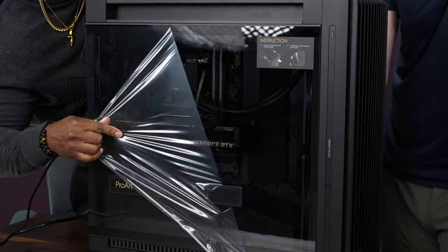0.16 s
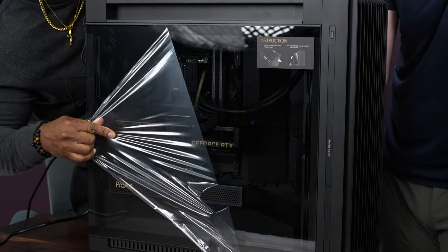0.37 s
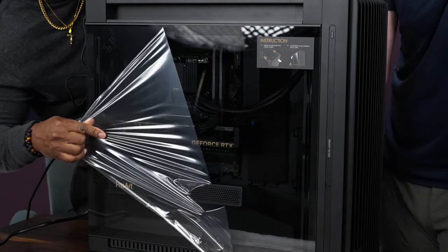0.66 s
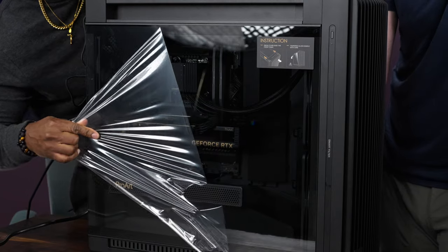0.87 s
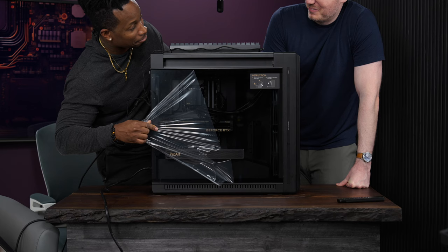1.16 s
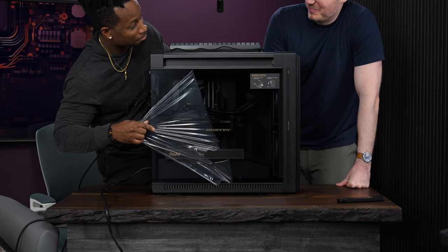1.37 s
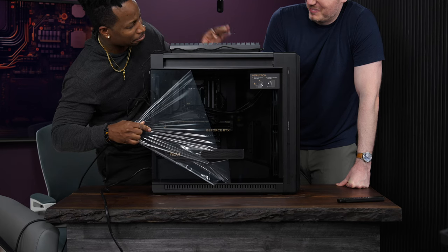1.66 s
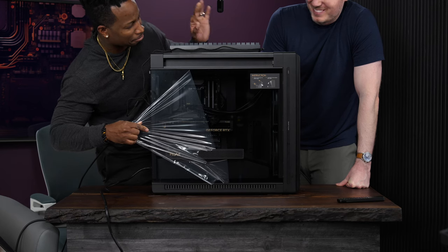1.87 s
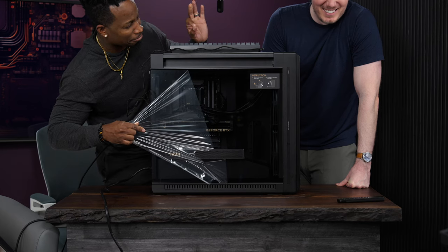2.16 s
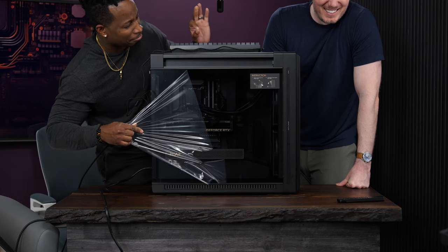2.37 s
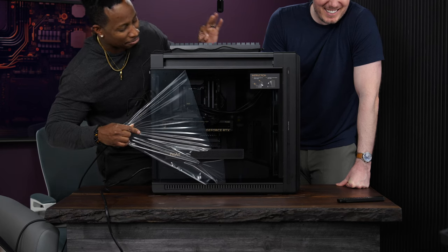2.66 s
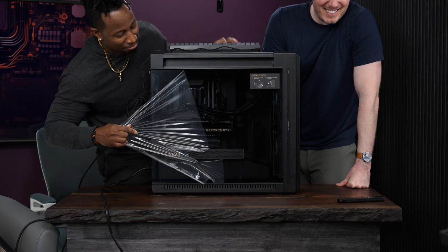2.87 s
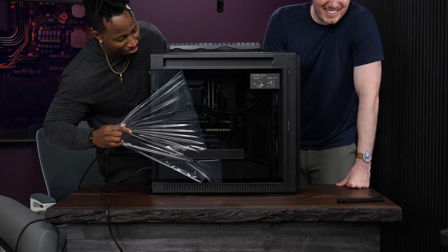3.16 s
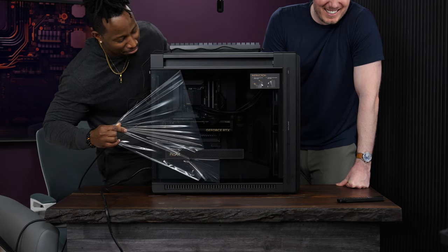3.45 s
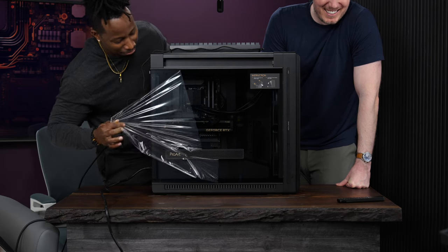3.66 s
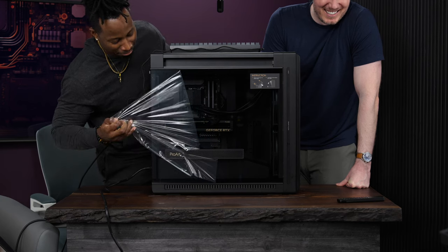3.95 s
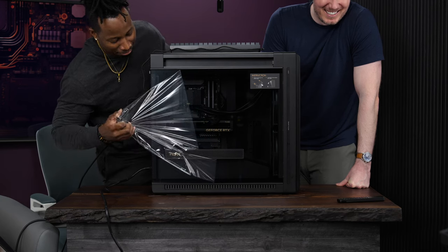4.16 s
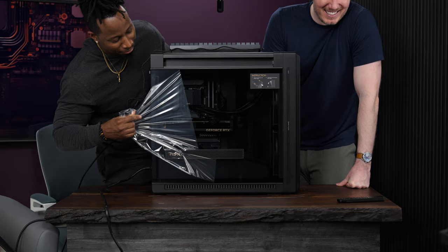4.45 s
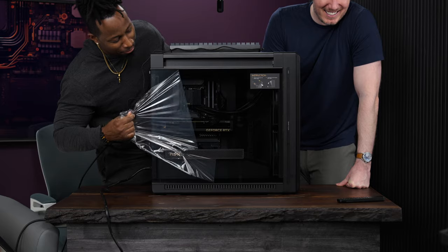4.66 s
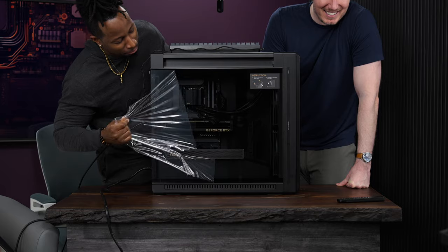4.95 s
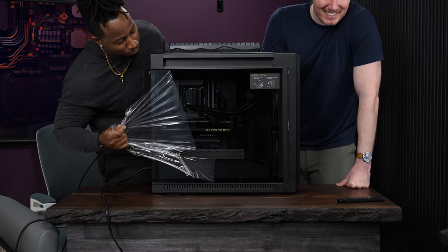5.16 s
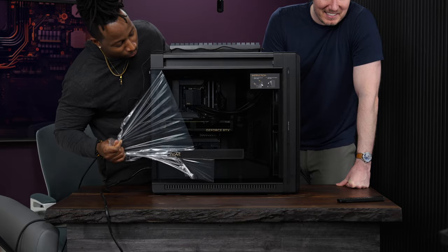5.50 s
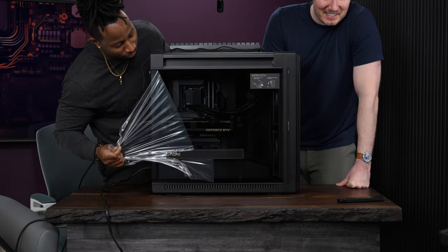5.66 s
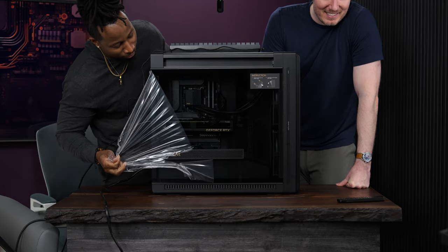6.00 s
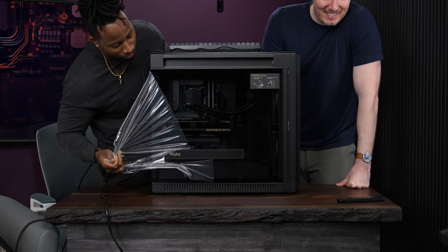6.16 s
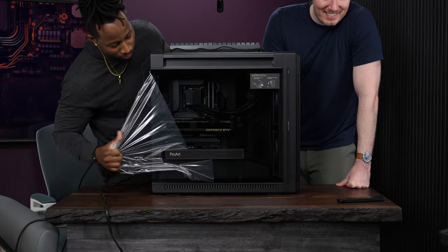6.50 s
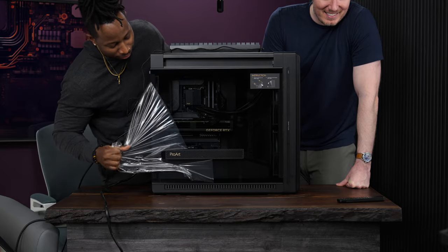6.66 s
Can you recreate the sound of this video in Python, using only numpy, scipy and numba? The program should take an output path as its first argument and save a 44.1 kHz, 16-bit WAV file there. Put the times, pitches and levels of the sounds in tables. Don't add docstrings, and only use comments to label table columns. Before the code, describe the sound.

A small, dry studio with faint steady air noise, close microphone. From 0 to 0.1 s, short low buzzes as sticky film stutters off glass; soft crackles at 0.3-0.4 s, a small tug, then tiny high squeals sliding down around 0.65 s. Buzzing trains at roughly a hundred slips a second run from 0.7 to 1.35 s, weakening into faint creaky stutters until 2.1 s. From 2.26 to 3.1 s, sharp crackling rips thump the glass like a drum, followed by a rapid run of irregular jerks at 3.2-3.4 s. Folds gather at 3.5-3.9 s with ticks. Loud, dense crumpling bursts from 4.0 to 4.35 s, strongest near 4.1 and 4.25 s with hollow knocks, and again at 4.5-4.9 s. From 5 to 5.9 s only sparse dry snaps and quiet creases; crackling gets busier at 6-6.6 s, with one sharper crease at 6.07 s. From 6.7 s a bright, dense hissing tear swells to the end.

```python
import sys
import numpy as np
from scipy import signal
from scipy.fft import rfft, irfft, next_fast_len
from scipy.io import wavfile
from scipy.ndimage import uniform_filter1d
from numba import njit

SR = 44100
rng = np.random.default_rng(int(sys.argv[2]) if len(sys.argv) > 2 else 0)


def bounce(signal):
    frames = np.transpose(np.atleast_2d(signal))
    limited = np.clip(frames, -1, 1)
    pcm = np.round(limited * 32767).astype(np.int16)
    wavfile.write(sys.argv[1], SR, pcm)


def boost_factor(decibels):
    exponent = np.asarray(decibels, float) / 20
    return 10 ** exponent


N = 301203
t = np.arange(N) / SR

# frequency in Hz, level in dB per Hz.
STUDIO_AIR = [(28, -28), (98, -15.5), (194, -13), (311, -18.5), (526, -30), (1160, -22), (6550, -20),
              (16000, -71)]
# time in seconds, length in seconds, depth in dB.
RESTS = [
    (5.106, 0.07, -4),
    (5.532, .04, -14),
    (5.87, 0.04, -12),
    (6.128, 0.023, -19),
    (6.443, 0.011, -9),
    (0.632, 0.082, -16),
    (2.23, .04, -3),
]

# start in seconds, end in seconds, slips per second in Hz,
# level in dB, panel push in dB.
EVEN_TRAINS = [
    (.003, .03, 126.9, -36, -11.5),
    (.0465, .074, 120.4, -36.5, -12.5),
    (.6981, .742, 101.4, -41, -20),
    (.7757, .905, 142.7, -44, -17),
    (.9091, .932, 103, -45, -21),
    (1.0491, 1.19, 101.9, -49, -22),
    (1.1978, 1.348, 103.8, -50, -20),
    (2.0103, 2.09, 103.6, -63, -16.5),
]
LOOSE_TRAINS = [
    (.0356, .04, 109, -35, -14),
    (.6905, .695, 110, -36, -29),
    (.7492, .772, 111, -50.5, -17),
    (.9491, 1.04, 103.5, -49.5, -18),
    (1.4826, 1.495, 108.4, -56, -19),
    (1.5254, 1.59, 111, -60.5, -18),
    (1.9317, 2.0, 104.2, -63, -16),
]
DYING_TRAINS = [
    (.0785, .102, 68.9, -53, -6),
    (.439, .5, 121.2, -55.5, -15),
    (1.3525, 1.364, 117, -54.5, -20),
    (1.4333, 1.47, 123, -57, -21),
]
GROWING_TRAINS = [
    (1.605, 1.685, 125.1, -64.5, -9),
    (1.6926, 1.746, 119, -57, -11.5),
    (2.0957, 2.12, 103, -62.5, -11),
]
# time in seconds, peak in dB.
JERKS = [(3.186, -46), (3.192, -46), (3.202, -38), (3.22, -41), (3.233, -43), (3.24, -27), (3.2472, -32.5),
         (3.2528, -31), (3.255, -32), (3.267, -29), (3.276, -37), (3.284, -28), (3.288, -26), (3.302, -48),
         (3.313, -30.5), (3.32, -30.5), (3.3289, -28), (3.3452, -30), (3.3542, -36), (3.3577, -27),
         (3.364, -41), (3.371, -24.5), (3.381, -32)]

# frequency in Hz, width in Hz, level in dB.
TAUT_FILM = [(2210, 610, 0.5), (3000, 700, 2), (5400, 3300, 4.5), (8060, 720, 4.5), (8530, 690, 2.5),
             (12140, 3000, 1), (13000, 710, -19), (1350, 260, -10.5), (15000, 1300, -1)]
STRIP = [(4450, 88, -27), (5300, 430, 4.5), (5650, 340, -12), (7590, 1100, -6), (8840, 240, -10.5),
         (10600, 280, -7), (13900, 580, -19)]
GLASS = [(626, 30, -7.5), (708, 24, -8.5), (990, 130, -14), (1252, 32, -12), (1620, 160, -6),
         (1907, 124, -2.5), (2150, 49, -5.5), (2820, 140, -5.5), (3150, 69, 0)]
PANEL = [(73, 46, 3), (140, 28.6, 4.5), (227.5, 86, 0), (146.5, 25, -18), (203, 9.7, 3.5)]
CASE_BODY = [(362, 101, -6), (513.3, 18, 2), (600, 147, 1.5), (843, 815, 4), (1014, 650, 4)]
# frequency in Hz, width in Hz, share removed from 0 to 1.
GAPS = [(3000, 350, 0.2), (6400, 130, 0.8), (8570, 560, 0.17), (10300, 410, 0.9), (12300, 630, 0.6),
        (13700, 600, .8)]
# frequency in Hz, level in dB per Hz.
FILM_COLOUR = [(710, -78), (1200, -10), (1590, -7), (2160, -4), (3010, -3.5), (5550, -1.5), (7700, -5),
               (15500, -11)]

# time in seconds, rustle in dB.
FIRST_RUSTLE = [
    (0.09, -50.5),
    (0.248, -65),
    (0.542, -60),
    (0.67, -73),
]
LATER_RUSTLE = [(1.36, -67.5), (1.57, -60), (1.8, -67), (2.5, -77.5), (3.12, -68), (3.2, -52.5),
                (3.385, -48.5), (3.43, -63), (3.66, -62), (4.04, -58), (4.34, -62.5), (4.57, -49.5),
                (4.72, -39), (4.89, -45), (4.98, -64.5), (5.9, -61.5), (6.14, -55), (6.51, -58.5)]
# time in seconds, peak in dB, panel in dB, fade T60 in seconds.
TUGS = [
    (0.407, -41.5, -24, 0.037),
    (0.588, -44, -40, 0.028),
]
RIPS = [(2.2676, -39.5, -10.5, 0.27), (2.399, -33, -26, 0.055), (2.559, -37, -26, 0.04),
        (2.6155, -23, -14, 0.092), (2.65, -43, -6, 0.081), (2.6939, -31.5, -8, 0.12),
        (2.7454, -39, -18, 0.035), (2.7764, -32, -9.5, 0.11), (2.8125, -38.5, -15, 0.075),
        (2.8598, -32, -9.5, 0.14), (2.967, -38, -17.5, 0.36), (3.043, -32, -18, 0.11),
        (3.202, -24, -44, 0.024)]
# time in seconds, peak in dB, panel in dB, fade T60 in seconds, film pitch in Hz.
GRABS = [
    (3.5161, -38.5, -18.5, 0.053, 3820),
    (3.546, -35, -29, 0.088, 4300),
    (3.573, -33, -23, 0.23, 2460),
    (3.6965, -25.5, -19, 0.13, 6400),
    (3.772, -53, -30, 0.05, 5670),
    (3.8946, -44, -3, 0.036, 6030),
]
CRUMPLES = [(4.088, -24, -37, 0.19, 6500), (4.1042, -10.5, -22, 0.074, 6400),
            (4.189, -27, -16, 0.033, 1900), (4.212, -37, -34, 0.018, 9700), (4.425, -29.5, -37, 0.02, 4350),
            (4.441, -30.5, -16, 0.1, 4020), (4.517, -36, -13, 0.22, 4900),
            (4.5483, -23.5, -24, 0.043, 2520), (4.655, -16, -24, 0.034, 3800),
            (4.7756, -16, -13, 0.035, 2580), (4.8283, -26, -16, 0.22, 5870),
            (4.902, -32.5, -12, 0.19, 2820), (4.982, -43.5, -18.5, 0.16, 5940),
            (6.585, -31, -12.5, 0.22, 4250)]
YIELDS = [(0.321, -40.5, -12.5, 0.16, 5500), (.338, -36, -10, 0.061, 5840),
          (2.309, -29.5, -10.5, 0.055, 5400), (2.4339, -27.5, -12, 0.15, 5630),
          (2.511, -23, -10, 0.12, 5400), (2.936, -35.5, -5, 0.11, 5400), (2.941, -31, -12, 0.087, 5400),
          (4.0051, -13, -16.5, 0.11, 2140), (4.0407, -13.5, -20, 0.12, 3930), (4.2467, -5, -16, 0.09, 2435),
          (4.313, -13, -7, 0.13, 4960), (4.583, -23, -34, 0.22, 3700), (4.639, -10, -43, 0.079, 3800),
          (5.295, -35, -40, 0.043, 4230)]
SLOW_GRABS = [
    (3.592, -19, -25, 0.15, 4570),
    (3.642, -27.5, -33, 0.074, 5600),
    (4.586, -21.5, -34, 0.08, 2600),
]
# time in seconds, peak in dB, fade T60 in seconds,
# film pitch in Hz, case body in dB.
CREASES = [(5.041, -43.5, 0.087, 1900, -5.5), (5.091, -59.5, 0.19, 4500, -1),
           (5.169, -37.5, 0.014, 4850, 2), (5.359, -51.5, 0.079, 3000, -1), (5.587, -50.5, 0.12, 2210, -3),
           (5.621, -46.5, 0.13, 1990, -6.5), (5.699, -40, 0.02, 3800, -6), (5.7281, -48, 0.098, 1510, 0.5),
           (5.884, -43.5, 0.26, 6200, -40), (5.941, -38, 0.058, 2400, -40), (5.984, -43, 0.15, 2320, -22),
           (6.035, -35, 0.043, 5900, -29), (6.073, -21.5, 0.073, 2560, -15.5),
           (6.138, -34, 0.03, 2620, -39), (6.197, -39, 0.11, 2600, -9), (6.222, -31, 0.1, 4070, -10),
           (6.2656, -29, 0.042, 4670, -19), (6.31, -37, 0.096, 6100, -10), (6.3874, -47.5, 0.57, 2420, -31),
           (6.4745, -38, 0.15, 6350, -19), (6.519, -43.5, 0.46, 5560, -25), (6.702, -40.5, 0.08, 5800, -46),
           (6.713, -40, 0.067, 7050, -41)]

# time in seconds, peak in dB, pitch in Hz.
KNOCKS = [(.15, -47.5, 577), (1.4, -55, 106), (1.708, -44, 550), (1.724, -37, 600), (2, -67, 554),
          (2.272, -37, 576), (2.5, -45, 540), (2.405, -45, 560), (2.44, -40, 550), (2.519, -28.5, 560),
          (2.562, -39.5, 526), (2.624, -28, 534), (2.7, -34, 520), (2.78, -48, 524), (2.862, -37, 520),
          (2.985, -43, 199), (3.05, -45, 524), (3.06, -39, 142), (3.595, -22.5, 1450), (4.012, -14, 2140),
          (4.041, -14, 790), (4.048, -10, 870), (4.0905, -21, 1260), (4.257, -13, 944), (4.045, -21, 560),
          (4.105, -9, 1316), (4.107, -14, 1006), (4.012, -23.5, 346), (4.04, -28.5, 118), (4.108, -27, 203),
          (4.25, -18, 132), (4.253, -17, 190), (4.835, -29, 120), (4.92, -37, 121), (4.254, -16, 2170),
          (4.256, -12.5, 1260), (4.258, -22, 522), (4.3135, -14, 203), (4.55, -23.5, 203),
          (4.628, -20, 203), (4.645, -18, 196), (5.345, -52, 555), (5.735, -42, 502), (5.74, -50, 148),
          (6.072, -33, 528), (6.588, -35.5, 79.6), (6.59, -34, 354), (6.592, -32, 650)]
SNAPS = [(0.3035, -43, 6400), (0.407, -31, 6580), (4.5064, -32, 5170), (4.6394, -19, 3770),
         (4.6556, -14, 3800), (4.7014, -26, 2710), (4.7317, -22, 4900), (4.7755, -21, 2670),
         (4.8044, -26, 5410), (4.881, -28, 4830), (5.0414, -48, 1960), (5.1687, -37.5, 5040),
         (5.1886, -51, 5390), (5.2024, -40, 5830), (5.2215, -43, 2990), (5.2435, -56, 4770),
         (5.2734, -43, 4450), (5.3737, -46, 5380), (5.416, -44, 5260), (5.5114, -44, 5070),
         (5.5323, -49, 2550), (5.551, -44, 5390), (5.5874, -40, 2240), (5.6205, -39, 3070),
         (5.8007, -37, 6100), (5.8828, -38, 3847), (5.8877, -38, 5640), (5.908, -44, 4610),
         (5.9434, -43, 2420), (5.9853, -30, 2320), (6.0376, -36, 4260), (6.0624, -37, 2500),
         (6.1584, -34, 6670), (6.1674, -27, 8150), (6.1823, -40, 2570), (6.2224, -30, 4130),
         (6.2311, -25.5, 2480), (6.2564, -26, 6020), (6.3088, -27, 6150), (6.4595, -44, 3560),
         (6.475, -35, 6120), (6.5196, -40, 5560), (6.7137, -37, 5890), (6.7501, -36, 5610),
         (6.7615, -21, 5840), (6.7754, -25, 4430), (6.8077, -28, 5400), (6.8165, -27, 6000)]
POPS = [(2.2668, -33.5, 5400), (2.4008, -35.5, 4870), (2.4399, -33, 5800), (2.4455, -26, 5650),
        (2.5215, -23, 5300), (2.6141, -25.5, 5300), (2.7766, -25, 5400), (2.8576, -27, 5460),
        (4.104, -35, 6500), (4.0595, -35, 5700), (4.2569, -10.5, 5530), (6.0743, -33, 2630),
        (6.3878, -42, 2480), (6.7008, -32, 6200), (6.8244, -17, 6230),
        (2.259, -61, 4000), (2.387, -59, 5000), (2.497, -42, 5800), (3.124, -48, 5240), (3.149, -50, 4830),
         (3.1679, -35, 5400), (3.173, -33, 5330), (3.458, -47, 5040), (3.502, -53, 5500),
         (3.484, -55, 3230), (3.531, -50, 7000), (3.554, -40, 5760), (3.566, -36, 5030), (3.585, -39, 3000),
         (3.743, -45, 4000), (3.775, -44, 5470), (3.844, -50.5, 2040), (3.861, -50, 7500),
         (3.93, -42, 5600), (3.956, -47, 5570), (3.974, -48, 6860), (3.991, -40, 7000), (5.957, -42, 4530),
         (5.993, -43, 2460), (6.204, -42, 2690), (6.4057, -42, 5730), (5.0405, -50, 2030),
         (5.132, -52, 4400), (5.262, -46, 4000), (5.382, -48, 6100), (5.4298, -44, 5500),
         (5.589, -53, 2300), (5.6056, -53, 1660), (5.682, -49.5, 1650), (5.701, -43, 3930),
         (5.837, -46, 5050), (5.846, -44, 6520)]
# start in seconds, end in seconds, first pitch in Hz, last pitch
# in Hz, level in dB.
SQUEALS = [(0.229, 0.263, 550, 630, -66), (0.413, 0.426, 6850, 5700, -50.5),
           (0.423, 0.434, 7900, 7600, -55), (0.42, .432, 6600, 6700, -52),
           (0.616, 0.653, 6740, 6460, -52.5), (0.657, 0.661, 6700, 5700, -48),
           (0.66, 0.669, 3930, 3850, -51), (.661, 0.677, 7800, 7650, -48),
           (0.668, 0.676, 3740, 3690, -43.5), (.677, 0.69, 3715, 2100, -43.5),
           (0.677, 0.686, 3880, 3770, -49), (0.681, 0.691, 4660, 4080, -43.5),
           (1.825, 1.867, 640, 540, -74), (1.952, 2.042, 207, 203, -65.5), (1.96, 2.047, 1210, 1200, -75),
           (2.05, 2.115, 1200, 1160, -75)]


def level(x, db):
    return x * boost_factor(db) / np.sqrt(np.mean(x ** 2))


@njit
def svf(x, hz, width):
    y = np.empty(len(x))
    band, low, g, k = 0., 0., 0., 0.
    for i in range(len(x)):
        if i == 0 or hz[i] != hz[i - 1]:
            g = np.tan(np.pi * hz[i] / SR)
            k = width / hz[i]
        v = (band + g * (x[i] + 1e-18 - low)) / (1 + g * (g + k))
        band = 2 * v - band
        low = low + 2 * g * v
        y[i] = k * v
    return y


def mode(x, hz, width):
    return svf(x, np.full(len(x), float(hz)), float(width))


def ring(x, modes):
    return sum((-1) ** k * boost_factor(db) * mode(x, hz, width) for k, (hz, width, db) in enumerate(modes))


def colour(x, points):
    hz, db = np.transpose(points)
    n = next_fast_len(N, True)
    bins_hz = np.fft.rfftfreq(n, 1 / SR)
    gain = boost_factor(np.interp(np.log(bins_hz + 1), np.log(hz), db))
    return irfft(rfft(x, n) * gain, n)[:N]


def grains(rate, spread_db):
    at, sign, size = rng.random((3, N // 8))[:, :int(rate * N / SR)]
    out = np.zeros(N)
    out[(at * N).astype(int)] = np.sign(sign - .5) * boost_factor(spread_db * np.minimum(-np.log(1 - size), 3))
    return level(out, 0)


def fade(x, t60):
    return signal.lfilter([1], [1, -1000 ** (-1 / (t60 * SR))], x + 1e-18)


def rests():
    return boost_factor(sum(db * np.exp(-((t - at) / wide) ** 2) for at, wide, db in RESTS))


def studio_air():
    return level(colour(rng.standard_normal(N), STUDIO_AIR), -73.5) * rests() ** 0.86


def slip_pulses():
    kinds = [(EVEN_TRAINS, (0.022, 0)), (LOOSE_TRAINS, (0.11, 0)),
             (DYING_TRAINS, (0.12, -74)), (GROWING_TRAINS, (0.084, 96))]
    trains = sorted((*row, *kind) for rows, kind in kinds for row in rows)
    pulses, pushes, membrane_db = np.zeros((3, N))
    for start, end, hz, db, panel_db, loose, slope_db in trains:
        membrane_db[(t >= start) & (t < end + .1)] = -11 + 25 * np.log2(hz / 100)
        now = start
        for late, size in rng.standard_normal((100, 2)):
            if now < end:
                i = int(now * SR)
                size_db = (.8 + 10 * loose) * size
                pulses[i] = boost_factor(db + slope_db * (now - start) + size_db) * np.sqrt(SR / hz)
                pushes[i] = pulses[i] * boost_factor(panel_db + 3.7 * np.clip(late, -3, 1))
                now += np.exp(loose * late) / hz
    at, db = np.transpose(JERKS)
    pushes[(at * SR).astype(int)] = boost_factor(db - 6.0)
    return pulses, pushes, membrane_db


def slips():
    pulses, pushes, membrane_db = slip_pulses()
    edge_echoes = 0.04 * np.roll(pulses, int(0.00049 * SR)) + 0.2 * np.roll(pulses, int(0.00116 * SR))
    snap = pulses + edge_echoes
    threads = (.028 * fade(pulses, .01) + .012 * fade(pulses, .08)) * rng.standard_normal(N)
    membrane = mode((2 * pulses + threads) * boost_factor(membrane_db), 4450, 380)
    membrane = membrane + 0.6 * mode(pulses * boost_factor(membrane_db), 7350, 600)
    push = fade(pushes, 0.0012)
    rough_push = push * (0.55 + 3.0 * uniform_filter1d(rng.standard_normal(N), size=8))
    out = ring(0.62 * snap + threads, TAUT_FILM) + membrane
    out = out + boost_factor(3.5) * ring(snap, STRIP)
    out = out + boost_factor(1.0) * ring(fade(pulses, 0.00015), GLASS)
    out = out + ring(push, PANEL) + boost_factor(3.5) * ring(rough_push, CASE_BODY)
    out = out + ring(pulses, [(5460, 720, -2), (7030, 750, -3.5), (9100, 400, -10), (11050, 610, -14.5)])
    for gap_hz, width, share in GAPS:
        out = out - share * mode(out, gap_hz, width)
    return out


def hand():
    first_end, later_start = FIRST_RUSTLE[-1][0], LATER_RUSTLE[0][0]
    hand_db = np.interp(t, *np.transpose(FIRST_RUSTLE + LATER_RUSTLE))
    hand_db[(t < FIRST_RUSTLE[0][0]) | (t > first_end) & (t < later_start)] = -120
    pull = boost_factor(-35) * np.clip((t - 6.67) / 0.1, 0, 1.15) ** 2
    panel = boost_factor(-74 + 1.41 * (hand_db + 61)) + boost_factor(-24.0) * pull
    body = boost_factor(-75 + 1.06 * (hand_db + 60)) + boost_factor(-19.0) * pull
    rest = rests()
    top = boost_factor(hand_db) * rest ** 0.033
    brisk = np.clip((top + 2 * pull) / boost_factor(-25.0), 0, 1)
    clumps = fade(np.abs(grains(70, 0.83)), 0.039) / np.sqrt(SR / 345)
    top = top * (0.57 + 0.44 * (t > later_start) * clumps) + 0.65 * pull
    return top, body * rest, panel * rest, pull, brisk


def releases():
    snap_s, yield_s = 0.00059, 0.0017
    taut = [(*r, -13) for r in TUGS] + [(*r, -15) for r in RIPS]
    rows = [(*r[:4], 5400 * np.exp(.08 * rng.standard_normal()), r[4]) for r in taut]
    rows += [(*r, -22.5) for r in GRABS] + [(*r, -13) for r in CRUMPLES]
    rows += [(at, db, -63, t60, hz, body_db) for at, db, t60, hz, body_db in CREASES]
    rows = [(*r, snap_s) for r in rows]
    rows += [(*r, -15.5, yield_s) for r in YIELDS]
    rows += [(*r, -22.5, 2 * yield_s) for r in SLOW_GRABS]
    return sorted(rows)


def crackle():
    shared = grains(1500, 8.5)
    out = np.zeros(N)
    for hz in 900 * 2 ** np.arange(0, 4.2, 1 / 3):
        own = grains(500, 3.3) + .5 * rng.standard_normal(N)
        out = out + mode(own + 0.5 * shared, hz, hz / 4)
    return level(colour(out, FILM_COLOUR), 0)


def torn_glue(pull):
    tear = level(colour(grains(6000, 3.3), FILM_COLOUR), 0) * pull
    return 0.32 * tear + 0.59 * np.diff(tear, prepend=0) + 0.6 * mode(tear, 5700, 1400)


def film():
    top, body, panel, pull, brisk = hand()
    blows, held = np.zeros((2, N))
    pitch_hz = np.full(N, 5000.)
    for at, db, panel_db, t60, hz, body_db, rise in releases():
        i = int(at * SR)
        age = t[:N - i][:SR // 4]
        span = slice(i, i + len(age))
        tail = 1000 ** (-age / np.clip(t60, .01, .5))
        top[span] += boost_factor(db - 11.0) * tail * (1 - np.exp(-age / rise))
        body[span] += boost_factor(db + body_db - 6.5) * tail * (1 - np.exp(-age / 0.0038))
        panel[span] += boost_factor(db + panel_db - 6.5) * tail ** 0.81 * (1 - np.exp(-age / 0.00097))
        blows[i] += boost_factor(db + panel_db + 16.0)
        pitch_hz[i:] = hz
        held[span] = np.exp(-age / 0.033)
    snaps = crackle() * top
    bright = snaps + 0.98 * held * svf(svf(snaps, pitch_hz, 810.0), pitch_hz, 1800.0)
    bright = bright + 0.83 * brisk * np.diff(snaps, prepend=0)
    bright = bright + torn_glue(pull)
    bright = bright + ring(snaps * (t < .3), [(4330, 420, 2), (2900, 170, -3), (2020, 320, 5)])
    cupped = (t > 5.87) & (t < 6.46)
    bright = bright + 0.51 * mode(snaps * cupped, 2550, 350)
    knock = level(ring(grains(2000, 1.2), CASE_BODY), 0) * body
    rattle = level(ring(rng.standard_normal(N), PANEL), 0) * panel
    drum = ring(rattle + ring(fade(blows, 0.0013), PANEL), [(142, 150, 0.014)])
    return 0.69 * bright + 1.14 * knock + drum


def flips(rows, cycles, hiss_share, rise_cycles=0.01):
    out, age = np.zeros(N + 4000), t[:4000]
    for at, db, hz in rows:
        i = int(at * SR)
        hiss = uniform_filter1d(rng.standard_normal(4000), size=3)
        click = (np.sin(2 * np.pi * hz * age) + hiss_share * hiss) * np.exp(-age * hz / cycles)
        out[i:i + 4000] += boost_factor(db) * click * (1 - np.exp(-age * hz / rise_cycles))
    return out[:N]


def creases():
    knocks = flips(KNOCKS, 3.15, 0.13, 0.53)
    snaps = flips(SNAPS, 1.1, 0.69)
    pops = flips(POPS, 2.4, 0.33)
    jerk_rows = [(at, db + 1.0, 5400 * np.exp(0.06 * rng.standard_normal())) for at, db in JERKS]
    return 0.43 * knocks + 0.77 * snaps + 1.3 * pops + flips(jerk_rows, 2.9, 0.32)


def squeals():
    out = np.zeros(N)
    for start, end, first_hz, last_hz, db in SQUEALS:
        on = (t >= start) & (t < end)
        way = (t[on] - start) / (end - start)
        rough = np.clip(.23 + .012 * (db + 49.0), 0.08, 1)
        over_db = -7 + 1.5 * (db + 52.0)
        waver, flutter = uniform_filter1d(rng.standard_normal((2, SR // 10)), size=40)[:, :on.sum()]
        hz = first_hz * (last_hz / first_hz) ** way * (1 + rough * waver)
        phase = 2 * np.pi * np.cumsum(hz) / SR
        over = sum(np.sin(k * phase) * (k * hz < 16000) * boost_factor(-1.5 * k) for k in range(2, 8))
        tone = np.sin(phase) + boost_factor(over_db) * over
        out[on] += boost_factor(db - 2 * (2 * way - 1) ** 2 + 40 * rough * flutter) * tone
    return out


def room(x):
    t60_s, tail_db = 0.13, -14.5
    age = t[:SR // 2]
    tail = rng.standard_normal(len(age)) * 1000 ** (-age / t60_s) * (age > .004)
    tail = mode(tail, 2500, 12000)
    return x + signal.fftconvolve(x, tail * boost_factor(tail_db) / np.sqrt(np.sum(tail ** 2)))[:N]


def scene():
    case = slips() + film() + creases() + squeals()
    return (studio_air() + room(case))[None]


def low_pass(x):
    return signal.sosfilt(signal.butter(12, 16520, fs=SR, output="sos"), x)


def record(dry):
    x = signal.sosfilt(signal.butter(2, 45, "high", fs=SR, output="sos"), dry)
    x = signal.sosfilt(signal.ellip(10, .2, 45, 15800, fs=SR, output="sos"), x)
    return low_pass(x)


dry = scene()
out = record(dry)
bounce(out)
```